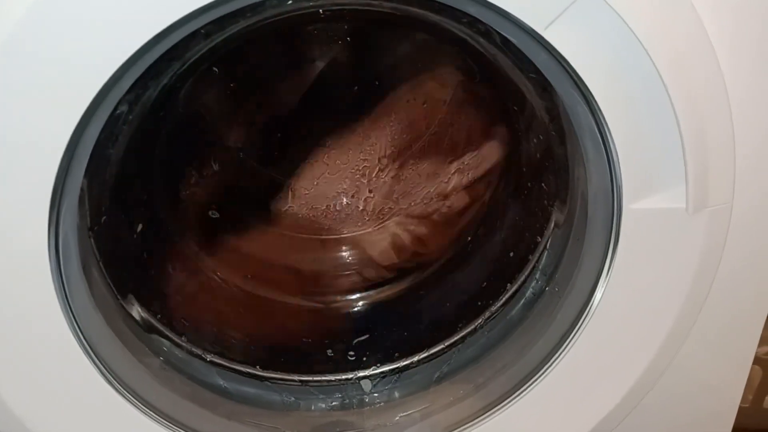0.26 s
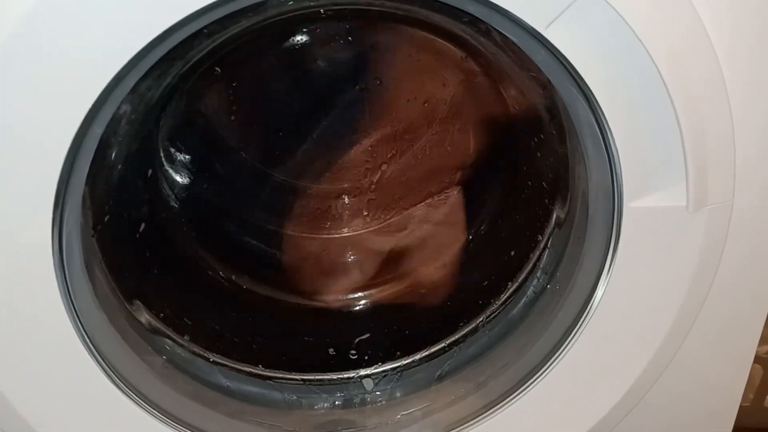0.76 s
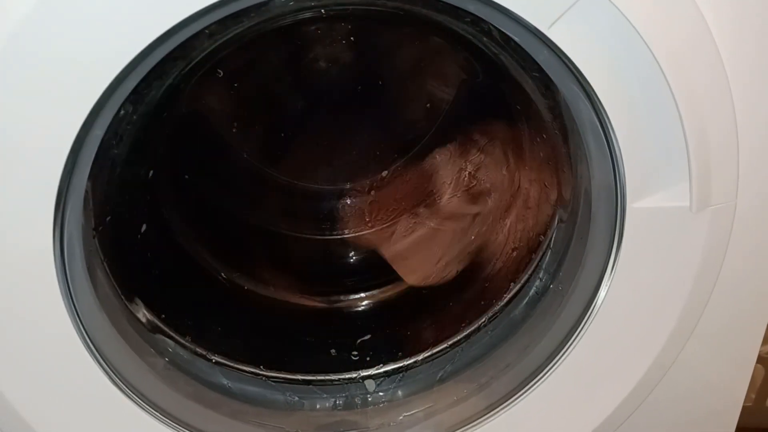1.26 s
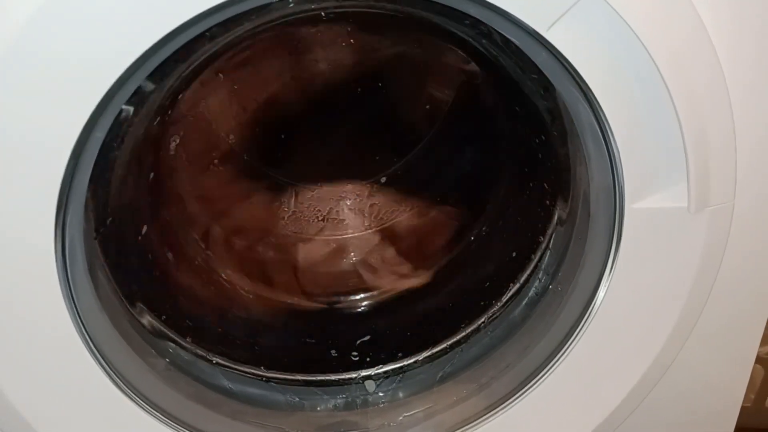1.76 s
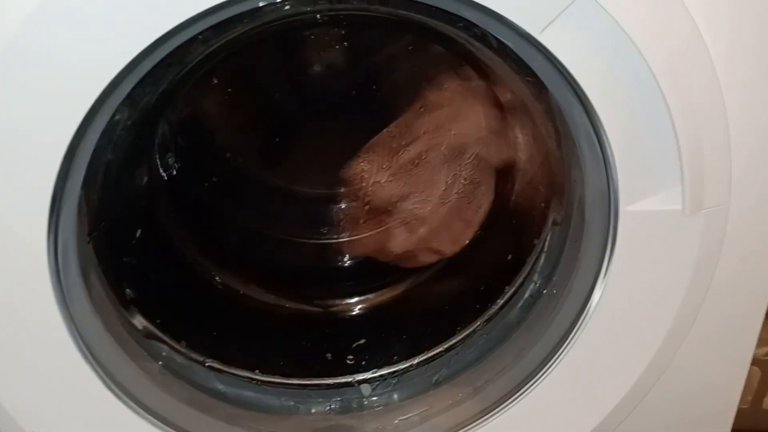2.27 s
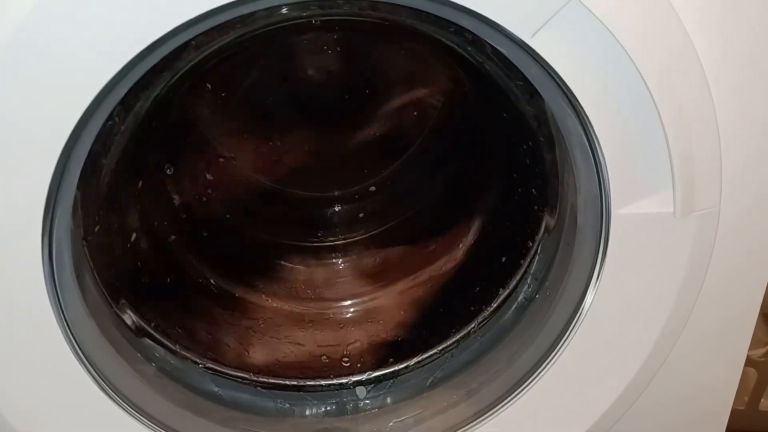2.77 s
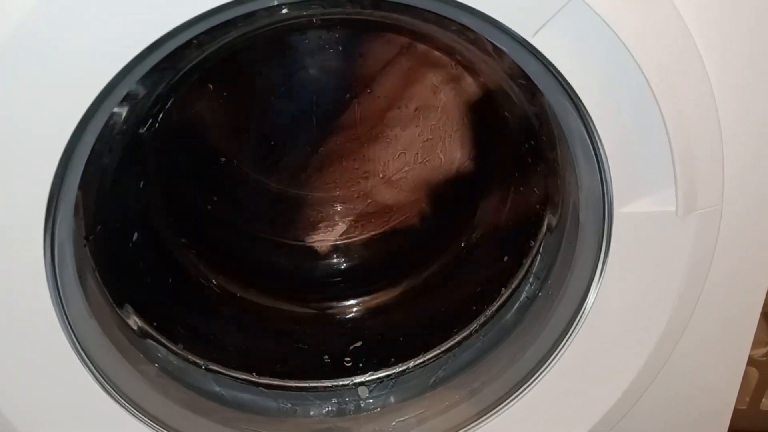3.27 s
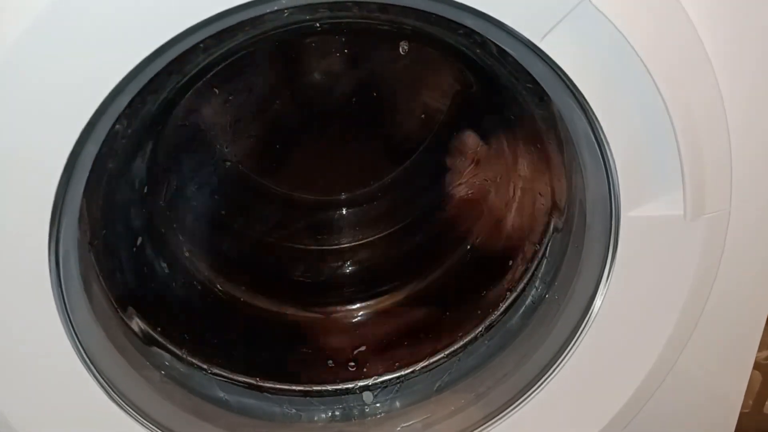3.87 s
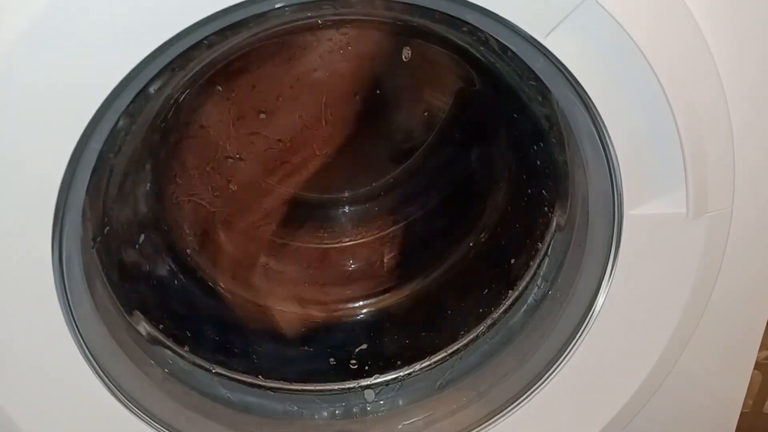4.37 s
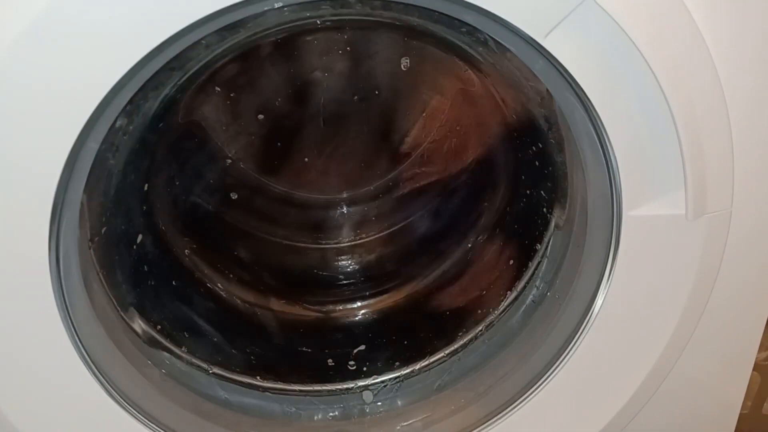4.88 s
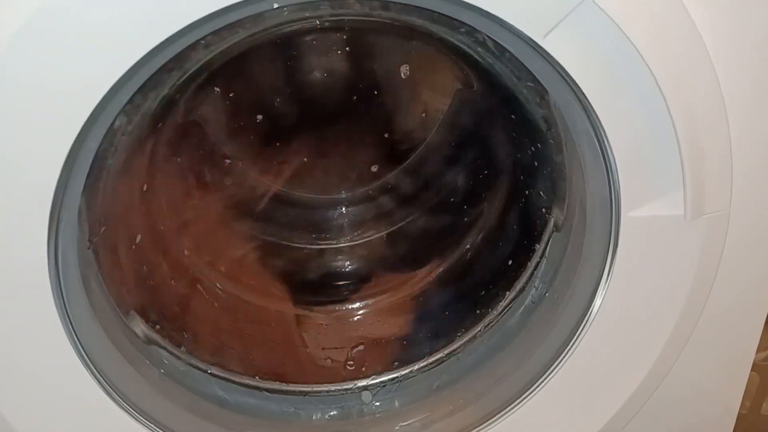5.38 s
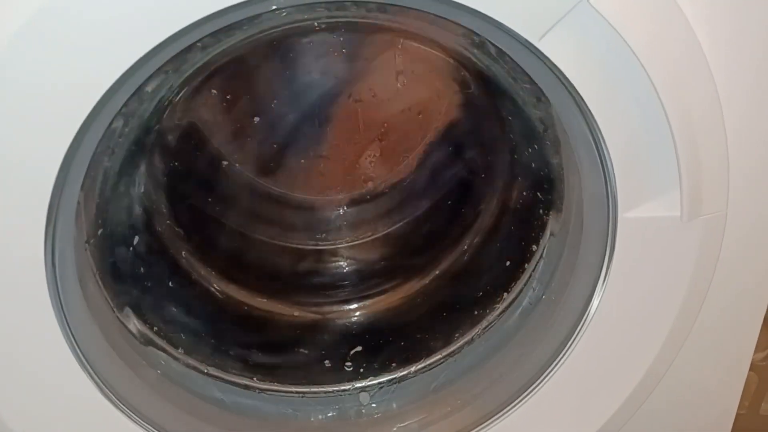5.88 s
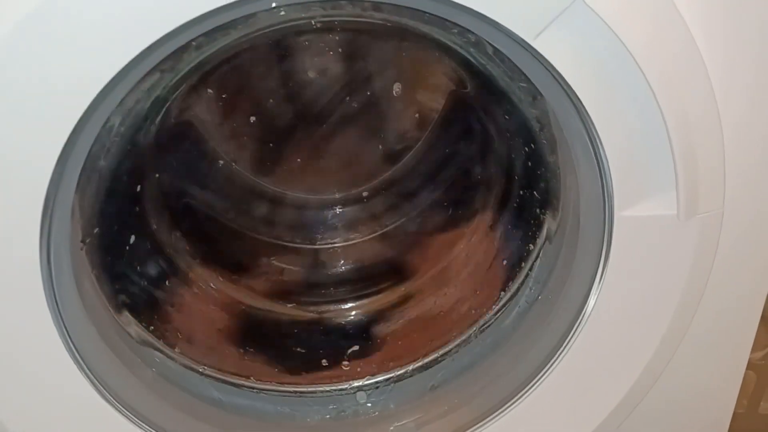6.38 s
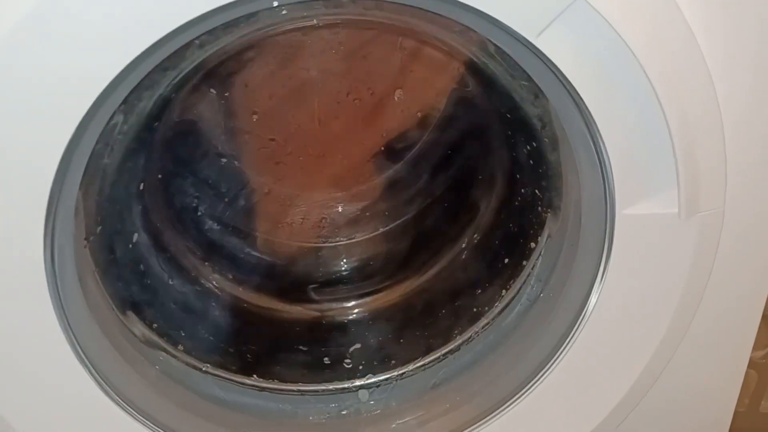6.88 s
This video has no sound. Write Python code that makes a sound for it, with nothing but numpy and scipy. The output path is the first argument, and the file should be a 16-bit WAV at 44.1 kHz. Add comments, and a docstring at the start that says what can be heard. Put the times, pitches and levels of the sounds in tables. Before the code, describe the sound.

A washing machine drum turns with a low hum while heavy wet laundry thumps and slaps unevenly, water spraying and fasteners occasionally ticking on the door.

```python
"""A front-loading washing machine in a small room, heard in stereo from just in front of its door.
From the first moment the motor hums and soaked clothes flop into the tub: shaken resonances thud, and
droplet noise slaps. Bursts of finer and heavier droplets spray the drum and the glass all along. From 1.6 s
small hard fasteners tick now and then: struck door resonances, answered by the room. Near 5.8 s wet cloth
squeaks faintly as swelling sines, the tub booms at about 6.1 s, and a last squeak follows at 6.7 s."""
import sys
import numpy as np
from scipy import signal
from scipy.fft import rfft, irfft, next_fast_len
from scipy.io import wavfile
from scipy.ndimage import uniform_filter1d, map_coordinates

SR = 44100
rng = np.random.default_rng(int(sys.argv[2]) if len(sys.argv) > 2 else 0)


def output_pcm(signal):
    """Save a mono or channel-first signal as 16-bit PCM at the path in sys.argv[1].

    Samples are clipped to [-1, 1] before scaling.
    """
    pcm = np.clip(np.atleast_2d(signal).T, -1, 1) * 32767
    wavfile.write(sys.argv[1], SR, np.round(pcm).astype(np.int16))


N = 314433

# Levels in the tables are relative: each source is trimmed and given its place in the stereo picture later.
# Motor and pump lines. Each row: frequency in Hz, level in dB.
MOTOR_LINES = [(58, -73.5), (80.7, -61.5), (114, -65), (151.5, -63.5), (228, -63), (294, -68), (508, -82.5),
               (728, -78.5), (5227, -101)]
# Spectrum of the turning drum. Each row: frequency in Hz, level in dB.
RUMBLE_SPECTRUM = [(20, -71), (40, -25), (60, 2.5), (100, 5), (150, -5.5), (300, -4), (450, -8.5),
                   (800, -19), (2000, -25.5), (3200, -44), (8000, -76)]
# Spectrum of the steady hiss. Each row: frequency in Hz, level in dB.
HISS_SPECTRUM = [(1000, -17), (3400, -4), (4200, 5), (5200, 8), (7500, 7), (10000, 3), (12000, 7.5),
                 (14300, 7), (14800, 11.5), (15700, 13.5)]
# Decay of the room. Each row: frequency in Hz, time to fall 60 dB in seconds.
ROOM_DECAY = [(100, .35), (1000, 0.088), (4000, 0.46), (14000, 0.29)]
# Booms of the tub under the falls. Each row: peak in seconds, frequency in Hz, level in dB,
# rise of the last 20 dB in seconds, time to fall 60 dB in seconds.
TUB_BOOMS = [(6.04, 81, -41, 0.11, 0.59), (6.14, 55, -54, .2, 1), (6.29, 226, -33.5, 0.015, 0.13),
             (6.3, 59, -50, 0.076, 0.32)]
# Cloth rubbing on the door and its seal. Each row: peak in seconds, frequency in Hz, level in dB,
# rise of the last 20 dB in seconds, time to fall 60 dB in seconds.
CLOTH_SQUEAKS = [(5.81, 846, -52.5, 0.05, 0.37), (5.81, 1235, -52, 0.045, 0.26),
                 (6.73, 2620, -55.5, 0.047, 0.26)]
# Fasteners hitting the door. Each row: start in seconds, level in dB, upper corner in Hz,
# lower corner in Hz, length of the chatter in seconds.
FASTENER_TICKS = [(1.633, -46.5, 10100, 885, 0.0028), (2.642, -45, 5770, 990, 0.0057),
                  (2.695, -42, 2240, 1090, 0.007), (3.398, -55, 15000, 8000, 0.018),
                  (4.204, -42.5, 8300, 1590, 0.011), (4.777, -55.5, 8140, 1000, 0.0063),
                  (5.965, -47.5, 13200, 4100, 0.0053), (6.238, -35.5, 1350, 1700, 0.0034),
                  (6.78, -45, 3200, 1300, 0.01), (6.82, -54, 2240, 1200, 0.0053)]
# Ring of the door. Each row: frequency in Hz, level in dB, time to fall 60 dB in seconds.
DOOR_MODES = [(1529, 4, .04), (1750, -5, .03), (1916, -3, .04), (2100, -8, .04), (2570, -5, .085),
              (3822, -11, .045), (4800, -9, .035), (5233, -4, .045), (7200, -9, .035), (8850, -9, .035),
              (9254, -12, .03), (10530, -14, .03), (11600, -13, .03), (13400, -11, .03)]
# Steel drum colouring the water. Each row: frequency in Hz, width in Hz, boost in dB (a cut if negative).
DRUM_MODES = [(595, 33, 1), (744, 17, 4), (856, 4, 4), (1012, 18, 8), (1084, 24, 6), (1405, 20, 6.5),
              (1836, 140, 2), (2194, 20, 8.5), (2705, 17, 6), (5230, 32, -7)]
# Water thrown against drum and door. Each row: start in seconds, fine drops in dB, heavy drops in dB.
SPRAY_BURSTS = [(0.0, -55.5, -56), (0.245, -53, -52.5), (0.862, -54, -50), (0.915, -75, -52),
                (1.253, -51, -48), (1.687, -75, -45), (1.774, -54, -54), (2.178, -56.5, -71),
                (2.534, -54.5, -44.5), (2.64, -52.5, -43), (2.775, -60.5, -73), (3.034, -67, -64),
                (3.19, -60.5, -58), (3.399, -48.5, -44), (3.626, -60, -66), (4.237, -51, -57),
                (4.459, -63.5, -62), (4.539, -58.5, -48.5), (4.736, -65, -75), (5.004, -61, -68),
                (5.195, -50, -64), (5.342, -60.5, -66), (5.42, -57.5, -52), (5.632, -69, -59),
                (5.784, -52.5, -48.5), (6.063, -48, -49), (6.22, -52.5, -65), (6.688, -52, -50.5),
                (6.941, -49.5, -53)]
# Spectrum of the fine drops. Each row: frequency in Hz, level in dB.
SPRAY_SPECTRUM = [(300, -1), (1000, 8.5), (1600, 10.5), (2400, 7), (3300, -3), (5000, 1.5), (6200, -6.5),
                  (7400, -2), (10000, -10), (13000, -7.5), (15800, -7.5)]
# Spectrum of heavy drops striking the drum. Each row: frequency in Hz, level in dB.
SPLAT_SPECTRUM = [(200, -18), (600, 4.5), (1100, -2.5), (1600, 0.5), (2100, -2), (2650, -9), (3200, -24.5),
                  (5000, -24.5), (8000, -32.5), (15000, -35)]
# Soaked clothes landing. Each row: start in seconds, length of contact in seconds,
# thud drive in dB, slap drive in dB.
CLOTH_FALLS = [(0.0, 0.042, -45, -44), (0.412, 0.087, -47.5, -51.5), (0.603, 0.057, -37.5, -45),
               (0.785, 0.019, -34.5, -38), (0.865, 0.029, -41.5, -45.5), (0.913, 0.013, -37, -38.5),
               (1.139, .045, -53.5, -61), (1.368, 0.059, -45.5, -50), (1.462, 0.067, -37, -41),
               (1.686, 0.022, -35.5, -35), (1.77, 0.029, -35, -39.5), (1.91, .025, -51, -53),
               (2.2, 0.1, -58, -61), (2.308, 0.042, -44, -45), (2.408, .046, -40, -43),
               (2.547, 0.023, -32.5, -39), (2.689, 0.018, -38.5, -42), (2.795, 0.029, -44.5, -47.5),
               (2.889, 0.01, -45.5, -72), (3.01, 0.092, -51.5, -75), (3.19, 0.021, -40, -46.5),
               (3.298, 0.039, -50, -52), (3.37, 0.081, -43, -48.5), (3.498, 0.035, -36, -43.5),
               (3.676, 0.022, -40.5, -44.5), (3.95, 0.043, -49.5, -58), (4.128, .1, -53.5, -53.5),
               (4.255, 0.097, -36.5, -42.5), (4.33, 0.029, -32.5, -39), (4.579, 0.0081, -34, -36.5),
               (4.81, 0.073, -46.5, -54.5), (5.008, 0.012, -42.5, -52), (5.16, .035, -45, -48.5),
               (5.195, 0.049, -41, -43.5), (5.423, 0.046, -40.5, -50), (5.699, 0.044, -44, -48),
               (6.054, 0.044, -34.5, -38), (6.277, 0.022, -37, -41.5), (6.488, .022, -45, -51),
               (6.59, 0.032, -49.5, -58.5), (6.942, 0.044, -34.5, -38)]
# Resonances of tub and cabinet. Each row: frequency in Hz, width in Hz, level in dB.
TUB_MODES = [(57.3, 13, -15.5), (88.3, 12.4, -7.5), (119, 24.5, -11.5), (149.7, 20.8, 2.5),
             (187.3, 21.7, -3.5), (217, 28, -2.5), (271.4, 29, 2.5), (303.6, 38.3, -1), (368.7, 42.6, -5.5),
             (459, 28.5, -8), (523, 21.3, -8)]
# Spectrum of the wet slap. Each row: frequency in Hz, level in dB.
SLAP_SPECTRUM = [(120, -23), (300, -7.5), (480, 4.5), (700, 4), (1100, -2), (1480, -0.5), (1950, -2.5),
                 (2400, -11), (3100, -21.5), (5000, -21), (8000, -32), (15000, -35)]
# Likeness of the two sides. Each row: frequency in Hz, left-right correlation.
SIDE_LIKENESS = [(60, 0.84), (170, 0.93), (350, 0.64), (700, 0.13), (1400, 0), (8000, 0.13)]
# Balance of the two sides. Each row: frequency in Hz, left minus right in dB.
SIDE_BALANCE = [(100, -.2), (350, -1.7), (700, .5), (1400, -2.9), (2800, -4), (5600, -4), (9000, -8.3),
                (14000, -7.3)]

TOP_HZ = 15850
HISS_DB = -69.7
SPRAY_ATTACK_S, SPRAY_T60_S = 0.008, 0.5
SQUEEZE_DB = -23  # mist that each landing squeezes out, relative to its slap
CONTACT_SAG_DB = 2.5  # a landing presses hardest at the first touch
HEM_DB, HEM_T60_S = -13.5, 0.22  # the hem brushes the drum before the weight lands; relative to the weight
SLUMP_DB, SLUMP_T60_S = -9.5, 0.44  # the rest of the cloth slumps after it; relative to the weight
# light folds keep toppling between the falls
FOLDS_PER_S, FOLD_CONTACT_S, FOLD_SCATTER_DB = 7, 0.06, 2
FOLD_THUD_DB, FOLD_SLAP_DB = -59, -68
# seams and thick folds knock within each slap; level relative to the slap's droplets
KNOCKS_PER_S, KNOCK_SCATTER_DB, KNOCK_DB = 170, 2.2, -5


def amp(db):
    """Decibels to gain."""
    return 10 ** (np.asarray(db) / 20)


def unit(x):
    """Scale to rms 1."""
    return x / np.sqrt(np.mean(x ** 2) + 1e-20)


def noise():
    """White noise in two unrelated channels."""
    return rng.standard_normal((2, N))


def along(points, hz):
    """Read a curve of (Hz, value) points on a log frequency axis."""
    f, value = np.transpose(points)
    return np.interp(np.log(hz + 1), np.log(f + 1), value)


def wobble(rate):
    """A smooth random curve with rate knots a second."""
    knots = rng.standard_normal(int(N * rate / SR) + 4)
    return map_coordinates(knots, [np.arange(N) * rate / SR])


def filtered(x, response):
    """Multiply the spectrum of x by a response, a function of frequency."""
    m = next_fast_len(N + SR // 2)
    return irfft(rfft(x, m) * response(np.fft.rfftfreq(m, 1 / SR)), m)[..., :N]


def coloured(x, spectrum):
    """Shape x by a (Hz, dB) spectrum, at rms 1."""
    return unit(filtered(x, lambda hz: amp(along(spectrum, hz))))


def swell(peak_s, rise_s, t60_s):
    """A gain that climbs to 1, the last 20 dB in rise_s, and then dies away."""
    t = np.arange(N) / SR - peak_s
    return np.exp(np.log(10) * np.clip(np.minimum(t / rise_s, -3 * t / t60_s), -8, 0))


def tone(hz, drift_hz, rate):
    """A sine of rms 1 with an unsteady pitch."""
    cycles = np.cumsum(hz + drift_hz * wobble(rate)) / SR
    return np.sqrt(2) * np.sin(2 * np.pi * (cycles + rng.random()))


def ring_on(power, t60_s):
    """Amplitude of a resonant space that stores the power fed in and lets it die away."""
    keep = amp(-120 / (t60_s * SR))
    return np.sqrt(signal.lfilter([1 - keep], [1, -keep], power))


def motor(rumble_db=-59, rumble_sway_db=0.79, load_sway_db=4.0):
    """The motor's lines waver with the shifting load, over the turning drum's rumble and a faint hiss."""
    hum = 0
    for hz, db in MOTOR_LINES:
        drift_hz = 3.49 + 0.00545 * hz
        hum = hum + amp(db + load_sway_db * wobble(9)) * tone(hz, drift_hz, 25)
    rumble = amp(rumble_db + rumble_sway_db * wobble(8.3)) * coloured(noise(), RUMBLE_SPECTRUM)
    hiss = amp(HISS_DB) * coloured(noise(), HISS_SPECTRUM)
    return rumble + hum * [[1], [0]] + hiss  # the hum enters the shared middle only


def room(x):
    """Reflections as a noise tail in which each frequency dies at its own speed."""
    hz, t, z = signal.stft(rng.standard_normal((2, SR // 2)), SR, nperseg=256)
    decay = amp(-60 * t / along(ROOM_DECAY, hz)[:, None])
    tail = signal.istft(z * decay, SR, nperseg=256)[1]
    return signal.fftconvolve(x, tail / np.linalg.norm(tail[0]), axes=1)[:, :N]


def resonances(table, drift_hz, rate):
    """Single resonances that swell and fade, each an unsteady sine."""
    total = 0
    for peak_s, hz, db, rise_s, t60_s in table:
        total = total + amp(db) * swell(peak_s, rise_s, t60_s) * tone(hz, drift_hz, rate)
    return total


def booms():
    """Low resonances of the tub under the falls, slightly unsteady in pitch."""
    return resonances(TUB_BOOMS, drift_hz=1.78, rate=13)


def squeaks():
    """Cloth rubbing on the door and its seal: faint tones with a quick flutter of pitch."""
    return resonances(CLOTH_SQUEAKS, drift_hz=7.8, rate=110)


def ticks(crack=0.12, crack_t60_s=0.019, chatter_db=-7, scatter_db=2):
    """A fastener chatters on the door and rings it; a padded one sounds dull, a glancing one thin."""
    out = np.zeros((2, N + SR))
    t = np.arange(SR // 4) / SR
    hz = np.fft.rfftfreq(SR // 2, 1 / SR)
    for s, db, upper_hz, lower_hz, chatter_s in FASTENER_TICKS:
        ring = 0
        for f, level, t60_s in DOOR_MODES:
            decay = amp(level + scatter_db * rng.standard_normal((2, 1)) - 60 * t / t60_s)
            ring = ring + decay * np.sin(2 * np.pi * (f * t + rng.random((2, 1))))
        chatter = amp(chatter_db) * 2 / (1 + (t / chatter_s) ** 4)
        snap = crack * amp(-60 * t / crack_t60_s) + chatter
        strike = ring + snap * rng.standard_normal((2, len(t)))
        # softness of the contact takes the top, a glancing hit loses the bottom
        high, low = 1j * hz / upper_hz, 1j * hz / lower_hz
        contact = (low / (1 + low)) ** 3 / (1 + np.sqrt(2) * high + high ** 2) ** 2
        hit = irfft(rfft(strike, SR // 2) * contact)[:, :len(t)]
        first_10_ms = hit[:, :SR // 100]
        start = round(s * SR)
        out[:, start:start + len(t)] += amp(db) * hit / np.std(first_10_ms)
    return out[:, :N]


def droplets(rate, spread_db, wash):
    """Tiny impacts of scattered size on a wash of noise, in two unrelated channels."""
    struck = rng.random((2, N)) < rate / SR
    sign = rng.choice([-1, 1], (2, N))
    hits = struck * sign * amp(spread_db * noise())
    return unit(unit(hits) + wash * noise())


def bubbles(rate, t60_s, spread_db, low_hz, high_hz):
    """Air pockets pinched off in the wet cloth: short pings that rise in pitch, in two channels."""
    pitch, chance, place, side = rng.random((int(rate * N / SR), 4)).T[:, :, None]
    t = np.arange(SR // 50) / SR
    hz = low_hz + (high_hz - low_hz) * pitch
    size = amp(-spread_db * np.log(1 - 0.97 * chance))  # many small, few large
    envelope = amp(-60 * t / t60_s) * (1 - np.exp(-t * hz))
    pings = size * np.sin(2 * np.pi * hz * t * (1 + 2 * t)) * envelope
    # both channels lie end to end, so that one count sums every ping
    where = (place * (N - len(t))).astype(int) + N * (side < 0.5) + np.arange(len(t))
    return unit(np.bincount(where.ravel(), pings.ravel(), 2 * N).reshape(2, N))


def patchy(x, depth_db):
    """Pockets of air in the moving load favour now one band, now another, at random."""
    z = signal.stft(x, nperseg=512)[2]
    field = rng.standard_normal(z.shape[1:])
    field = uniform_filter1d(field, size=5, axis=0)  # across frequency
    field = uniform_filter1d(field, size=7, axis=1)  # across time
    return signal.istft(z * amp(depth_db * unit(field)), nperseg=512)[1][:, :N]


def in_drum(x, spectrum):
    """Water shaped by its spectrum, the drum's resonances and the shifting load, at rms 1."""
    def response(hz):
        boost_db = sum(db / (1 + (2 * (hz - c) / w) ** 2) for c, w, db in DRUM_MODES)
        return amp(along(spectrum, hz) + boost_db)
    return unit(filtered(patchy(x, depth_db=1.5), response))


def flung():
    """Power of the fine and the heavy drops: each spray builds up quickly, then patters away."""
    fine, heavy = np.zeros(N), np.zeros(N)
    for s, fine_db, heavy_db in SPRAY_BURSTS:
        burst = swell(s + SPRAY_ATTACK_S, SPRAY_ATTACK_S, SPRAY_T60_S) ** 2
        fine += amp(fine_db) ** 2 * burst
        heavy += amp(heavy_db) ** 2 * burst
    return fine, heavy


def sprays(spray_power, slap_power, level_db=3, patter_db=0.7, mist_t60_s=0.67):
    """Fine drops patter on drum and door, thrown by the drum or squeezed out of the cloth."""
    mist = amp(SQUEEZE_DB) * ring_on(slap_power, mist_t60_s)
    flow = np.hypot(np.sqrt(spray_power), mist)
    pings = bubbles(rate=1000, t60_s=0.041, spread_db=0.0, low_hz=1166, high_hz=14020)
    water = droplets(rate=2800, spread_db=1.0, wash=0.95) + 0.34 * pings
    return amp(level_db + patter_db * wobble(90)) * flow * in_drum(water, SPRAY_SPECTRUM)


def splats(power, level_db=-2.0):
    """The heavy drops of each spray smack on the steel."""
    drops = droplets(rate=700, spread_db=4.0, wash=0.73)
    return amp(level_db) * np.sqrt(power) * in_drum(drops, SPLAT_SPECTRUM)


def landings(rows):
    """Power fed in by cloth, from (s, length s, dB) rows: the hem, the weight, then the slump."""
    weight = np.zeros(N + SR)
    for s, length_s, db in rows:
        sag = np.linspace(0.5, -0.5, round(length_s * SR))
        press = amp(db + CONTACT_SAG_DB * sag) ** 2
        start = max(round(s * SR), 0)
        weight[start:start + len(press)] += press
    weight = weight[:N]
    hem = amp(HEM_DB) * ring_on(weight[::-1], HEM_T60_S)[::-1]  # run backwards: it leads up to the weight
    slump = amp(SLUMP_DB) * ring_on(weight, SLUMP_T60_S)
    return hem ** 2 + weight + slump ** 2


def tumble():
    """Thud and slap power of the whole load: the main falls, and light folds at uneven intervals."""
    falls = list(CLOTH_FALLS)
    for k in range(int(FOLDS_PER_S * N / SR)):
        s = (k + rng.random()) / FOLDS_PER_S
        size_db = rng.uniform(-FOLD_SCATTER_DB, FOLD_SCATTER_DB)
        falls.append((s, FOLD_CONTACT_S, FOLD_THUD_DB + size_db, FOLD_SLAP_DB + size_db))
    thud_power = landings([(s, length_s, thud_db) for s, length_s, thud_db, _ in falls])
    slap_power = landings([(s, length_s, slap_db) for s, length_s, _, slap_db in falls])
    return thud_power, slap_power


def knocks():
    """Seams and thick folds: short noise bursts at uneven moments common to both channels."""
    hits = droplets(rate=KNOCKS_PER_S, spread_db=KNOCK_SCATTER_DB, wash=0)[0]
    t = np.arange(SR // 50) / SR
    burst = rng.standard_normal((2, len(t))) * amp(-60 * t / 0.015)
    return unit(signal.fftconvolve(hits[None], burst, axes=1)[:, :N])


def tub_response(hz):
    """The summed resonances of tub and cabinet, which radiate little deep bass."""
    modes = 0
    for k, (centre, width, db) in enumerate(TUB_MODES):
        mode = 1j * hz * width / (centre * centre - hz * hz + 1j * hz * width)
        modes = modes + (-1) ** k * amp(db) * mode
    return modes * hz ** 4 / (hz ** 4 + 55.0 ** 4) / (1 + (hz / 900) ** 4)


def flops(thud_power, slap_power, slap_db=-1.0, thud_lag_s=0.0029, thud_t60_s=0.34, slap_t60_s=0.26,
          fold_db=0.63, steadiness=0.44):
    """Each landing squeezes water out of the cloth with a slap; its weight shakes the tub just after."""
    shake = unit(filtered(noise(), tub_response))
    # the tub's motion follows the falling weight closely, whichever modes take it up
    shake = unit(shake / np.abs(uniform_filter1d(shake ** 2, size=1500)) ** (steadiness / 2))
    late_power = np.pad(thud_power, (round(thud_lag_s * SR), 0))[:N]
    thuds = ring_on(late_power, thud_t60_s) * shake
    # folds of cloth touch down one after another
    folds = unit(amp(fold_db * wobble(110)))
    pings = bubbles(rate=500, t60_s=0.061, spread_db=3.5, low_hz=348.5, high_hz=2680)
    water = droplets(rate=1800, spread_db=2.5, wash=0.82) + 0.18 * pings + amp(KNOCK_DB) * knocks()
    slaps = amp(slap_db) * ring_on(slap_power, slap_t60_s)
    return thuds + slaps * folds * in_drum(water, SLAP_SPECTRUM)


def spread(pair):
    """Stereo picture at the door: bass reaches both sides alike; the treble is diffuse and leans right."""
    def middle_and_side(hz):
        turn = np.arccos(np.clip(along(SIDE_LIKENESS, hz), -1, 1)) / 2
        return np.array([np.cos(turn), np.sin(turn)])

    def balance(hz):
        gains = amp(along(SIDE_BALANCE, hz) * np.array([[0.5], [-0.5]]))
        return gains / np.sqrt(np.mean(gains ** 2, axis=0))  # total power kept

    mid, side = filtered(pair, middle_and_side)
    return filtered(np.array([mid + side, mid - side]), balance)


def scene():
    """The motor, the door, the water and the load, in a small room that answers the ticks."""
    drive = motor()
    tones = booms() + squeaks()
    door = ticks()
    thud_power, slap_power = tumble()
    fine_power, heavy_power = flung()
    water = sprays(fine_power, slap_power) + splats(heavy_power)
    load = flops(thud_power, slap_power)
    door_in_room = door + amp(-3.5) * room(door)
    return spread(drive + tones * [[1], [0]] + door_in_room + water + load)


def record(dry):
    """The recorder keeps nothing above its band limit."""
    return filtered(dry, lambda hz: hz < TOP_HZ)


dry = scene()
out = record(dry)
output_pcm(out)
```